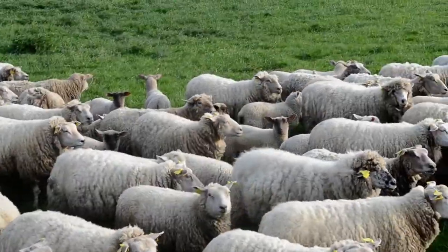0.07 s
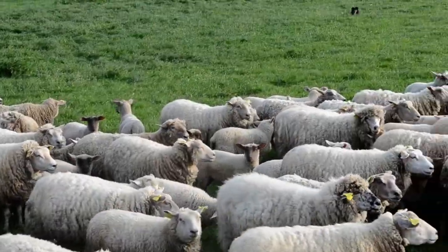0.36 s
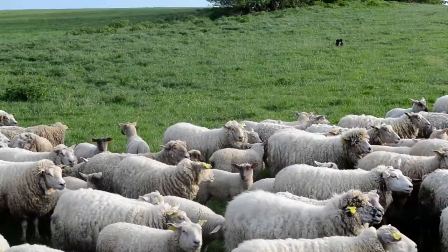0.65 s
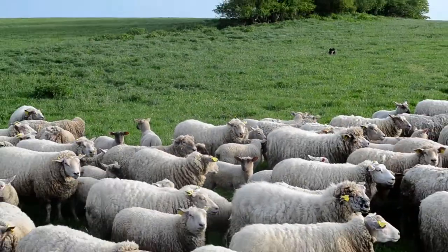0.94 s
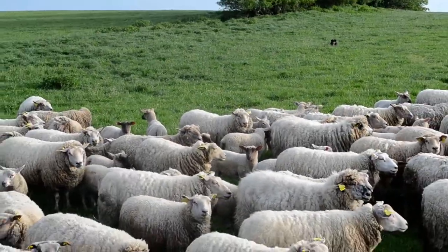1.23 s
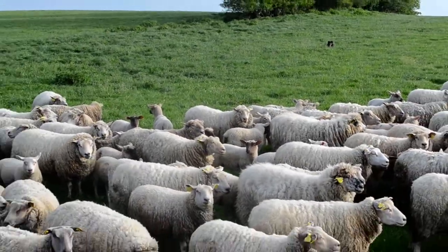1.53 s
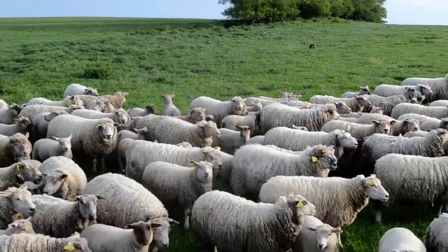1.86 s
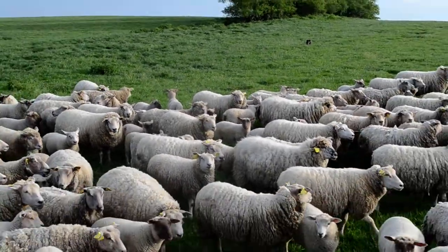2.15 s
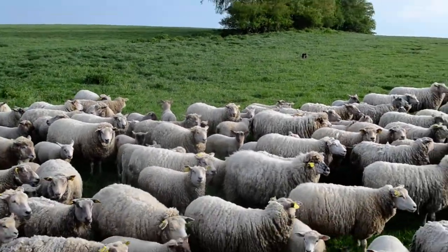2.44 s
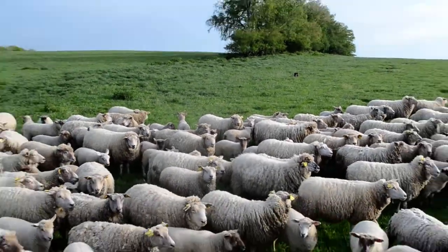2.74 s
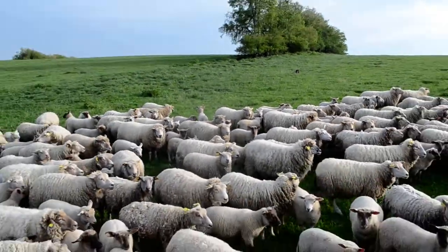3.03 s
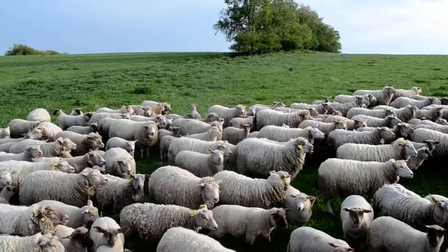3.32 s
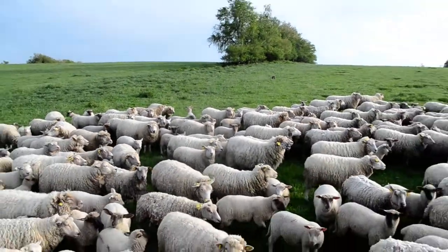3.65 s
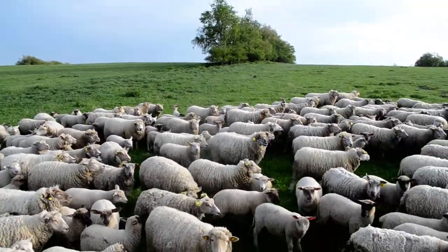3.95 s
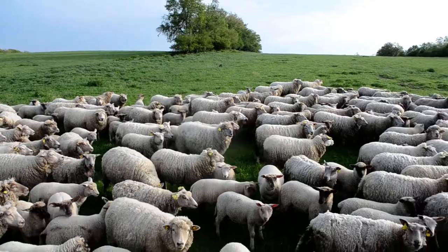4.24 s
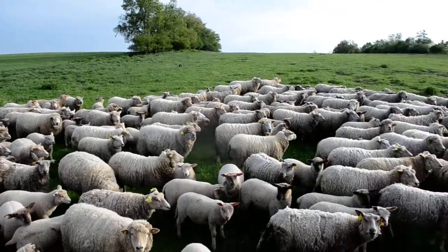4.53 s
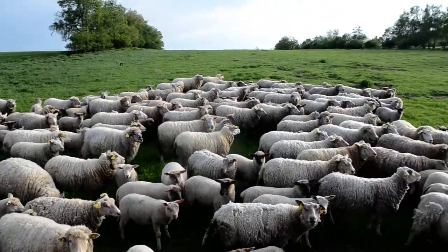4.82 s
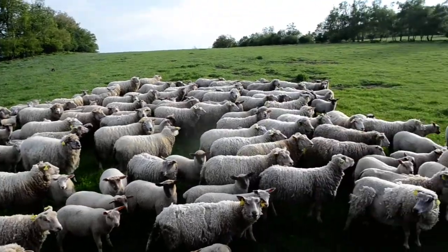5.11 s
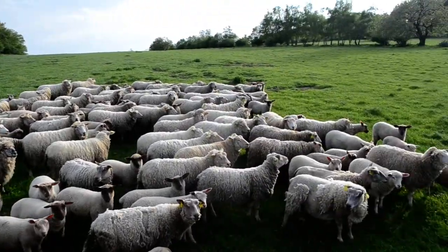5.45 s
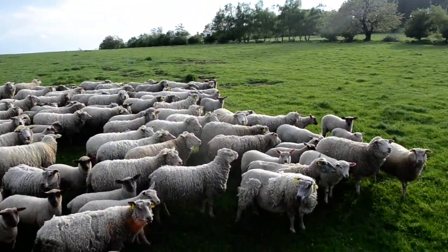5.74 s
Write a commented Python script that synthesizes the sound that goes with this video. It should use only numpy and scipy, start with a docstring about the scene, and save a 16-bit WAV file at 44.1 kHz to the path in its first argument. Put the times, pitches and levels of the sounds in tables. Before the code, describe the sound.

On an open hillside, a faint, quavering sheep bleat sounds over a soft, steady hiss of air. After about a second, wind rumbles on the microphone and a ewe gives one loud, raspy bleat close by. The rest is quiet: snuffles, creaky throat clicks, light hoof knocks, snapping stalks and brushed grass, with thin whistles of distant birds. A short dry trill comes midway and a soft, low grunt near the end.

```python
"""Sheep on a grassy hillside. Over a steady hiss of air, a faint bleat rattles; snuffles, throat creaks,
shuffling feet and thin whistles of distant birds follow. After a second, as wind buffets the microphone,
a ewe bleats close by, her vocal folds pulsing through a changing throat: a creaky start, an open cry,
a held note, a sagging end. Stalks snap, hooves knock and legs brush the grass. Past three seconds a dry
trill quickens; more creaks come in runs, and a low grunt sounds near the end."""
import sys
import numpy as np
from scipy import signal
from scipy.fft import rfft, irfft, next_fast_len
from scipy.io import wavfile
from scipy.ndimage import uniform_filter1d, map_coordinates

SR = 44100
rng = np.random.default_rng(int(sys.argv[2]) if len(sys.argv) > 2 else 0)


def persist_wave(psi):
    """Save psi, clipped to +-1, as 16-bit WAV."""
    counts = np.round(np.clip(psi, -1, 1) * 32767).astype(np.int16)
    wavfile.write(sys.argv[1], SR, np.atleast_2d(counts).T)


N = 263718


def amp(db):
    """Amplitude ratio of a level in decibels."""
    return 10 ** (np.asarray(db) / 20)


def unit(x):
    """Normalisation to rms 1."""
    return x / np.sqrt(np.mean(x ** 2) + 1e-20)


def at_peak(x, db):
    """Normalisation to a peak level."""
    return amp(db) * x / np.abs(x).max()


def levelled(x):
    """Normalisation to a running rms of 1 over a few cycles."""
    power = uniform_filter1d(uniform_filter1d(x ** 2, size=1400), size=1400)
    return x / np.sqrt(np.abs(power) + 1e-9)


def clock():
    """The time of every sample in seconds."""
    return np.arange(N) / SR


def curves(rows):
    """Linear interpolation: one value per sample for each column after the time."""
    times, *columns = np.transpose(rows)
    return [np.interp(clock(), times, column) for column in columns]


def swell(rows, fade_s):
    """Amplitude envelope from the last column (dB), fading to silence outside its span."""
    inside_s = np.minimum(clock() - rows[0][0], rows[-1][0] - clock())
    return amp(curves(rows)[-1]) * np.clip(1 + inside_s / fade_s, 0, 1)


def gate(start_s, end_s, attack_s, release_s):
    """Trapezoidal envelope: rises around the start, holds, falls around the end."""
    return np.clip(.5 + np.minimum((clock() - start_s) / attack_s, (end_s - clock()) / release_s), 0, 1)


def bumps(rows):
    """A sum of Gaussian envelopes, each with standard deviation sigma_s."""
    return sum(amp(db) * np.exp(-.5 * ((clock() - s) / sigma_s) ** 2) for s, sigma_s, db in rows)


def wobble(rate_hz):
    """Random modulation: a smooth curve through rate_hz random values a second."""
    return map_coordinates(rng.standard_normal(int(N * rate_hz / SR) + 4), [np.arange(N) * rate_hz / SR])


def colour(x, spectrum, peaks=()):
    """Minimum-phase filter of unit energy: a spectral outline with Lorentzian peaks or dips."""
    size = 2 * next_fast_len(len(x) // 2 + 2048)
    hz = np.fft.rfftfreq(size, 1 / SR)
    outline_hz, outline_db = np.transpose(spectrum)
    db = np.interp(np.log(hz + 1), np.log(outline_hz + 1), outline_db)
    for centre_hz, width_hz, lift_db in peaks:
        db = db + lift_db / (1 + (2 * (hz - centre_hz) / width_hz) ** 2)
    cepstrum = irfft(np.log(unit(amp(db)) + 1e-6))
    cepstrum[1:size // 2] *= 2  # folding the cepstrum makes the filter causal
    cepstrum[size // 2 + 1:] = 0
    return irfft(rfft(x, size) * np.exp(rfft(cepstrum)))[:len(x)]


def noise(spectrum, peaks=()):
    """Filtered white noise of rms 1."""
    return unit(colour(rng.standard_normal(N), spectrum, peaks))


def burst(t, t60_s, spectrum):
    """Impact noise: an exponentially decaying excitation, filtered."""
    return colour(rng.standard_normal(len(t)) * amp(-60 * t / t60_s), spectrum)


def resonance(x, hz, width_hz):
    """Heterodyne band-pass at a fixed or moving frequency: shift to zero, smooth, shift back."""
    carrier = np.exp(2j * np.pi * np.cumsum(np.broadcast_to(hz, N)) / SR)
    pole = np.exp(-np.pi * width_hz / SR)
    return 2 * np.real(carrier * signal.lfilter([1 - pole], [1, -pole], x / carrier))


def add(track, start_s, sound):
    """Superposition of a short sound on a track."""
    part = track[max(round(start_s * SR), 0):][:len(sound)]
    part += sound[:len(part)]


def open_air():
    """Broadband noise: the even rush of the hillside and a high hiss of grass whose level wanders."""
    # frequency_hz, level_db
    air_spectrum = [(30, -25), (70, -13), (140, -5), (300, -3), (800, -2.5), (1300, -5), (2200, -6.5),
                    (5000, -17.5), (11000, -55.5)]
    blade_spectrum = [(1000, -10), (2500, -2), (5000, 0.5), (8800, 0.5), (10000, -3), (11400, -21)]
    # level of the high hiss: time_s, level_db
    hiss_level = [(0, -64), (3.2, -69.5), (3.9, -65), (4.15, -72.5), (4.6, -68), (5.98, -64.5)]
    hiss = amp(curves(hiss_level)[0] + .6 * wobble(14)) * noise(blade_spectrum)
    return amp(-62) * noise(air_spectrum) + hiss


def wind(lumps_db=3.5):
    """Turbulent pressure fluctuations at the microphone make a low, lumpy rumble."""
    # one long gust, then calm: time_s, level_db
    gust = [(0, -70.5), (1.05, -67), (1.17, -53.5), (1.82, -54.5), (2.12, -67), (2.8, -74), (3.1, -87),
            (5.98, -77.5)]
    # short puffs on top: centre_s, sigma_s, level_db
    puffs = [(2.035, 0.015, -58.5), (2.385, 0.011, -48.5), (2.48, 0.011, -53.5), (2.96, 0.025, -56)]
    # frequency_hz, level_db
    buffet_spectrum = [(13, -54), (22, -31), (48, -6), (107, -2.5), (210, -7.5), (280, -14.5), (430, -45),
                       (730, -120)]
    strength = amp(curves(gust)[0] + lumps_db * wobble(23.9)) + bumps(puffs)
    return amp(-1) * strength * levelled(noise(buffet_spectrum, peaks=[(116, 55, 3.5)]))


def vocal_folds(pitch_hz, pulse_at_s, roughness, jitter, shimmer_db):
    """Glottal source: a pulse and a puff of turbulence each cycle, less steady and breathier if rough."""
    roughness = np.broadcast_to(roughness, N)
    cycles = np.cumsum(pitch_hz * (1 + jitter * roughness * wobble(90))) / SR
    cycles -= np.interp(pulse_at_s, clock(), cycles)
    closures = np.interp(np.arange(np.ceil(cycles[0]) + 2, cycles[-1] - 2), cycles, np.arange(N))
    whole = closures.astype(int)
    shimmer = amp(shimmer_db * roughness[whole] * rng.standard_normal(len(closures)))
    heights = np.sqrt(SR / pitch_hz[whole]) * shimmer
    taps = whole[:, None] + np.arange(-7, 9)
    offset = taps - closures[:, None]
    shapes = heights[:, None] * np.sinc(offset) * np.sinc(offset / 8)  # band-limited impulses
    pulses = np.bincount(taps.ravel(), shapes.ravel(), N)
    puffs = unit(rng.standard_normal(N) * (np.exp(-9 * (cycles % 1)) + 0.14))
    return (pulses + roughness * puffs) / np.sqrt(1 + roughness ** 2)


def rattling_bleat():
    """Amplitude modulation makes a thin, hoarse voice quaver while one resonance sinks."""
    # time_s, pitch_hz
    pitch = [(0, 131.6), (.124, 133.4), (.18, 139.7), (.23, 145.5), (.3, 147.3), (.335, 151.7),
             (.36, 140.2), (.44, 133.4)]
    # time_s, level_db
    quaver = [(.034, -52), (.054, -56), (.061, -42), (.076, -44), (.09, -59), (.11, -55.5), (.137, -44.5),
              (.163, -54.5), (.192, -46.5), (.222, -44), (.238, -48), (.263, -43), (.288, -47.5),
              (.308, -43), (.346, -42), (.366, -54), (.398, -43.5), (.425, -46.5), (.437, -52)]
    # frequency_hz, level_db
    throat = [(200, -16), (600, -12.5), (980, -8.5), (1450, -11), (1800, -8.5), (2200, -0.5), (2700, -2),
              (3200, -9), (3800, -7), (4900, -15.5), (5500, -13), (6400, -36), (10000, -58)]
    # centre_hz, width_hz, lift_db
    formants = [(970, 310, 11), (2020, 300, 5.5), (2460, 110, 5.5), (3160, 250, 12.5)]
    # time_s, centre_hz
    sinking_ring = [(.06, 2260), (.22, 2270), (.43, 2020)]
    source = vocal_folds(curves(pitch)[0], pulse_at_s=.304, roughness=.48, jitter=.035, shimmer_db=2)
    voice = colour(source, throat, formants)
    voice += 1.54 * resonance(voice, curves(sinking_ring)[0], width_hz=180)
    return levelled(voice) * swell(quaver, fade_s=.008)


def snuffles(flutter_db=0.77, gain_db=2.1):
    """Turbulent breath rushes unevenly through a sheep's muzzle and excites its nostril resonances."""
    # start_s, length_s, level_db, growth_db
    breaths = [(0.391, .63, -52.5, .5), (1.838, 0.12, -45.5, -11.5), (2.516, 0.39, -56, 11),
               (3.437, 0.3, -52.5, 4.5), (3.799, 0.078, -57.5, -0.5), (3.91, 0.13, -71, 11),
               (5.67, 0.2, -64.5, 0)]
    # frequency_hz, level_db
    muzzle = [(150, -13), (600, -4), (1200, 1), (1450, -2), (1900, 6), (2250, 0.5), (2900, -2), (3500, -6),
              (4000, -5.5), (5500, -13.5), (8600, -12.5), (10500, -29)]
    # centre_hz, width_hz, lift_db
    nostril = [(1733, 130, 5), (2473, 190, 16.5)]
    flow = np.zeros(N)
    for start_s, length_s, level_db, growth_db in breaths:
        progress = np.clip((clock() - start_s) / length_s, 0, 1)
        envelope = gate(start_s, start_s + length_s, attack_s=0.04, release_s=0.086)
        flow += amp(level_db + growth_db * progress) * envelope
    return flow * amp(gain_db + flutter_db * wobble(70)) * noise(muzzle, nostril)


def creaks(attack_s=0.0011, rise_per_s=4):
    """Vocal fry: slack folds flap in single pulses, each a dry tick and damped modes bending upward."""
    # even runs of pulses: first_s, last_s, count, first_peak_db, last_peak_db, ring_hz, tick_over_ring_db
    runs = [ (.491, .491, 1, -33.5, -34, 2580, -6), (1.041, 1.052, 2, -35, -30.5, 2100, -13),
            (1.064, 1.064, 1, -31, -38, 2030, -5), (1.075, 1.086, 2, -27, -25, 2080, -10),
            (3.131, 3.1315, 1, -43, -42.5, 1854, -7), (3.261, 3.2725, 2, -45, -40, 1860, -4),
            (3.304, 3.304, 1, -41.5, -43, 1910, -8), (4.4596, 4.4593, 1, -41, -40.5, 1740, 1),
            (4.544, 4.545, 1, -39.5, -38, 1900, -14), (4.57, 4.581, 2, -38, -34, 1930, -15),
            (4.609, 4.609, 1, -36, -36.5, 2000, -8), (4.6355, 4.648, 2, -41, -35, 1860, -15),
            (4.676, 4.69, 2, -41, -42, 2170, 2), (4.713, 4.72, 2, -34, -34.5, 1830, -11),
            (4.731, 4.743, 2, -36, -40, 1870, -5), (4.758, 4.7995, 4, -41, -39, 2040, 7),
            (5.836, 5.8594, 4, -45, -39.5, 2150, -5), (5.931, 5.967, 2, -41, -38.5, 1840, -1), ]
    # throat modes: frequency_ratio, level_db, t60_s (for a 2000 Hz ring)
    modes = [(.57, -3, 0.03), (.86, -4, 0.013), (1.028, 19.5, 0.012), (1.32, -3, 0.01)]
    # frequency_hz, level_db
    tick_spectrum = [(400, -21), (1050, 6), (2400, 7), (3400, -15.5), (5200, -27)]
    out, t = np.zeros(N), np.arange(SR // 20) / SR
    bent_time = t * (1 + rise_per_s * (t - .005))
    for first_s, last_s, count, first_db, last_db, ring_hz, tick_db in runs:
        age = t * ring_hz / 2000  # higher rings die sooner
        phase = 2 * np.pi * ring_hz * bent_time
        for start_s, peak_db in np.linspace((first_s, first_db), (last_s, last_db), count):
            ring = sum(amp(level_db + rng.standard_normal() - 60 * age / t60_s) * np.sin(ratio * phase)
                       for ratio, level_db, t60_s in modes)
            ring *= 1 - np.exp(-t / attack_s)
            tick = burst(t, t60_s=0.0059, spectrum=tick_spectrum)
            add(out, start_s, at_peak(unit(ring) + amp(tick_db) * unit(tick), peak_db))
    return out


def friction(strokes, spectrum, grain_db):
    """Friction noise: random amplitude modulation gives grain to strokes that swell and fade."""
    return bumps(strokes) * unit(noise(spectrum) * amp(grain_db * wobble(250)))


def shuffles():
    """Friction of feet on turf gives a dull scuff."""
    # centre_s, sigma_s, level_db
    strokes = [(.59, 0.05, -58), (2.205, 0.014, -61), (4.33, 0.064, -54.5), (5.44, 0.045, -59),
               (5.81, 0.032, -58.5)]
    # frequency_hz, level_db
    turf = [(60, -60), (140, 2.5), (200, -4), (260, -4), (450, -6), (900, -11.5), (1400, -17), (2500, -24),
            (5000, -40)]
    return friction(strokes, turf, grain_db=2.5)


def bird_whistles(waver=0.024, echo_db=-6, echo_t60_s=.4):
    """Frequency modulation: thin notes glide and waver; reflection from trees adds a faint echo."""
    # start_s, length_s, start_hz, end_hz, level_db
    notes = [(0.795, 0.053, 3250, 2920, -59), (2.132, 0.11, 2270, 1970, -59.5), (2.3, .11, 3120, 3030, -68),
             (2.405, 0.09, 2170, 2000, -61), (2.57, .07, 2200, 2080, -61), (3.286, 0.2, 7250, 7450, -71),
             (3.793, 0.1, 5900, 6750, -69), (4.17, 0.065, 1966, 2150, -57), (4.224, 0.088, 2820, 2440, -56),
             (4.432, 0.06, 2015, 2350, -58.5), (4.48, .06, 2500, 2720, -67), (4.73, 0.12, 3150, 3560, -71),
             (4.795, 0.093, 2220, 2130, -68), (5.865, 0.049, 2880, 2580, -57.5)]
    out, unsteady = np.zeros(N), 1 + waver * wobble(550)
    for start_s, length_s, start_hz, end_hz, level_db in notes:
        progress = np.linspace(0, 1, round(length_s * SR))
        glide_hz = start_hz + (end_hz - start_hz) * progress
        hz = glide_hz * unsteady[round(start_s * SR):][:len(progress)]
        envelope = amp(level_db) * np.sqrt(2) * np.sin(np.pi * progress)
        add(out, start_s, envelope * np.sin(2 * np.pi * np.cumsum(hz) / SR))
    tail = rng.standard_normal(SR // 2) * amp(-60 * np.arange(SR // 2) / SR / echo_t60_s)
    return out + amp(echo_db) * signal.fftconvolve(out, tail / np.linalg.norm(tail))[:N]


def fold_rebound(source, share=.7, scatter=.06, tighten_s=1.271):
    """Until they tighten, slack folds rebound: a weaker slap about 1 ms after each pulse makes a rasp."""
    # time_s, rate_hz
    bounce_rate = [(1.15, 737), (1.2, 866), (1.24, 935)]
    delay_s = (1 + scatter * wobble(130)) / curves(bounce_rate)[0]
    slap = map_coordinates(source, [np.arange(N) - delay_s * SR])
    return source + share * (clock() < tighten_s) * slap


def vocal_tract(source, mouth_shape):
    """Formant filtering, cross-faded through four mouth shapes: 0 opening, 1 wide, 2 held, 3 closing."""
    # throat spectra: frequency_hz, level_db
    opening = [(100, -58.5), (350, -14), (600, -6.5), (1050, -18), (1400, -6.5), (1750, -5), (2550, 2.5),
               (3300, -13), (3800, -9.5), (4700, -23.5), (5200, -28), (7400, -27.5), (11000, -54)]
    wide = [(100, -40), (300, -24.5), (500, -10), (1000, -18), (1600, -10.5), (2350, -2), (2800, -10),
            (3900, -14.5), (4700, -22), (5200, -31), (8000, -29.5), (11000, -67)]
    held = [(100, -28.5), (290, -22), (450, -14), (850, -8.5), (1050, -14), (1600, -11), (2400, -8),
            (2650, -14.5), (3050, -16.5), (3400, -24), (4800, -31.5), (7400, -38), (11000, -55)]
    closing = [(100, -25), (300, -13.5), (500, -4.5), (850, -1.5), (1050, -9.5), (1600, -10), (2750, -3.5),
               (3600, -23.5), (4700, -22), (7500, -40), (11000, -48)]
    # throat resonances and antiresonances of side cavities: centre_hz, width_hz, lift_db
    opening_formants = [(553, 93, 17), (1387, 180, 15), (2190, 260, 7.5)]
    open_formants = [(588, 76, 14.5), (1307, 171, 17.5), (2065, 274, 11.5), (2393, 170, 7),
                     (3770, 230, 3.5)]
    closing_formants = [(780, 140, 3.5), (1257, 100, 19.5), (2100, 190, 7)]
    hollows = [(5030, 310, -11), (6460, 590, -17)]
    throats = [(opening, opening_formants + hollows), (wide, open_formants + hollows),
               (held, open_formants), (closing, closing_formants)]
    return sum(np.clip(1 - np.abs(mouth_shape - k), 0, 1) * colour(source, *throat)
               for k, throat in enumerate(throats))


def shifting_resonances(voice):
    """Time-varying filtering: low booms, a soft onset and two high peaks sinking with a dip between."""
    # the lowest resonance booms as the voice catches and at its crest: centre_s, sigma_s, level_db
    booms = [(1.15, 0.015, -12), (1.287, 0.0057, -3)]
    # the first pulses close softly and lack their upper edge: time_s, missing_share
    soft_start = [(1.12, .45), (1.165, 0)]
    # a high resonance sinks from the crest onward: time_s, centre_hz
    top_ring = [(1.29, 4670), (1.38, 4420), (1.46, 3950), (1.68, 3800), (1.8, 3384)]
    top_hz, = curves(top_ring)
    voice = voice + bumps(booms) * resonance(voice, hz=563, width_hz=72)
    voice -= curves(soft_start)[0] * resonance(voice, hz=4300, width_hz=1500)
    voice += .6 * resonance(voice, top_hz, width_hz=220)
    voice -= .75 * resonance(voice, top_hz + 440, width_hz=280)
    return voice + .85 * resonance(voice, top_hz + 640, width_hz=270)


def close_bleat(hoarse_db=-29):
    """Source and filter: glottal pulses pass through a throat that opens, settles and closes."""
    # time_s, pitch_hz
    pitch = [(1.1, 95.9), (1.13, 109.4), (1.2, 127.8), (1.262, 130.9), (1.292, 140.5), (1.32, 130.5),
             (1.4, 141.9), (1.46, 146.2), (1.53, 144.6), (1.74, 142.2), (1.812, 134.6), (1.835, 110.6)]
    # time_s, level_db
    loudness = [(1.102, -41.5), (1.11, -34), (1.13, -32.5), (1.18, -28), (1.29, -22), (1.33, -25),
                (1.6, -28), (1.75, -30.5), (1.8, -34), (1.825, -35), (1.84, -42), (1.865, -44.5),
                (1.88, -57)]
    # time_s, roughness, mouth_shape
    articulation = [(1.1, 0.29, 0), (1.2, 0.25, 0.5), (1.25, 0.22, .4), (1.285, .13, .85),
                    (1.355, .13, 1.26), (1.43, .13, 1.71), (1.74, .15, 2), (1.795, .25, 2.5),
                    (1.825, 0.3, 3), (1.88, 0.87, 3)]
    # air that passes the folds along with the tone: frequency_hz, level_db
    hoarse_air = [(300, 2), (700, -17), (1500, -20), (2400, -11), (3400, 4), (4300, 1), (5100, -5.5),
                  (7200, -6.5), (11000, -31)]
    roughness, mouth_shape = curves(articulation)
    source = vocal_folds(curves(pitch)[0], pulse_at_s=1.109, roughness=roughness,
                         jitter=.015, shimmer_db=1)
    voice = shifting_resonances(vocal_tract(fold_rebound(source), mouth_shape))
    return (levelled(voice) + amp(hoarse_db) * noise(hoarse_air)) * swell(loudness, fade_s=0.01)


def stalks(gain_db=-4):
    """Brittle fracture: each snapping stalk gives a tiny burst of bright noise."""
    # start_s, level_db, centre_hz
    snaps = [(1.266, -34, 9600), (2.091, -36, 3280), (2.406, -32.5, 7400), (5.247, -38, 5950)]
    out, t = np.zeros(N), np.arange(SR // 30) / SR
    for start_s, level_db, hz in snaps:
        snap = burst(t, t60_s=0.003, spectrum=[(hz / 1.7, -36), (hz, 0), (1.3 * hz, -20)])
        add(out, start_s, at_peak(snap, level_db + gain_db))
    return out


def hooves(t60_s=0.033, gain_db=-1):
    """Damped impact: each hoof gives a thud with a gritty click on top."""
    # start_s, level_db, click_over_thud_db
    knocks = [(2.024, -44.5, 1), (2.195, -44.5, -14), (2.209, -43, -15), (2.992, -36, 3.5),
              (3.745, -35, -16), (3.934, -41, -5.5), (4.492, -49.5, -3), (5.333, -43.5, -24),
              (5.377, -43, -30), (5.404, -49, -21), (5.464, -46.5, -26), (5.773, -43, -13),
              (5.945, -41.5, -8)]
    # frequency_hz, level_db
    thud_spectrum = [(40, -53), (130, -25), (300, -1), (550, 4.5), (1200, 2.5), (1800, -22), (5000, -58)]
    click_spectrum = [(900, -52), (1900, -4), (2600, 7.5), (3600, -14), (4800, -30), (11000, -55)]
    out, t = np.zeros(N), np.arange(SR // 12) / SR
    for start_s, level_db, click_db in knocks:
        thud = at_peak(burst(t, t60_s, thud_spectrum), level_db)
        click = at_peak(burst(t, t60_s, click_spectrum), level_db + click_db)
        add(out, start_s, thud + click)
    return amp(gain_db) * out


def swishes():
    """Friction of legs against grass gives a brief, bright swish."""
    # centre_s, sigma_s, level_db
    strokes = [(2.088, 0.014, -50.5), (3.085, 0.018, -52.5), (4.035, 0.017, -57), (4.67, .025, -64),
               (5.72, 0.036, -54)]
    # frequency_hz, level_db
    grass = [(290, -64), (500, -9), (1020, -3), (2180, -10), (2450, -2), (4120, -12.5), (8720, -11),
             (12000, -38)]
    return friction(strokes, grass, grain_db=3.0)


def trill(start_s=3.201, first_gap_s=.0202, first_sigma_s=.0029, first_hz=2337, climb_hz=71):
    """Linear chirps: noisy upward sweeps in Gaussian envelopes grow shorter, higher and closer."""
    # time_s, peak_db
    loudness = [(3.2, -49.5), (3.27, -49.5), (3.32, -38.5), (3.38, -41.5), (3.4, -45)]
    # frequency_hz, level_db
    chirp_spectrum = [(500, -18), (1100, 7), (1550, -5), (2000, -1), (3100, -1), (3700, -6), (4300, -11),
                      (6000, -18), (10000, -30)]
    out, t = np.zeros(N), np.arange(-(SR // 100), SR // 100) / SR
    for k in range(12):
        stretch, detune = 1 + rng.standard_normal(2) * [.16, .04]
        sigmas = t / (first_sigma_s * .94 ** k * stretch)
        hz = detune * (first_hz + k * climb_hz) + 676 * sigmas
        gritty_tone = np.sin(2 * np.pi * np.cumsum(hz) / SR) + rng.standard_normal(len(t))
        chirp = colour(np.exp(-.5 * sigmas ** 2) * gritty_tone, chirp_spectrum)
        peak_db = np.interp(start_s, *np.transpose(loudness))
        add(out, start_s + t[0], at_peak(chirp, peak_db))
        start_s += first_gap_s * .976 ** k
    return out


def grunt():
    """A few slow glottal pulses excite the low resonances of the throat."""
    # time_s, pitch_hz, level_db
    contour = [(5.643, 92.3, -54), (5.655, 89.5, -47), (5.668, 93.9, -44), (5.682, 97, -49)]
    # frequency_hz, level_db
    throat = [(120, -38), (274, -34), (362, -12), (516, 3.5), (691, -8), (832, -20), (1280, -7),
              (1520, -22), (2170, -10), (2490, -25), (4500, -29), (8000, -60)]
    source = vocal_folds(curves(contour)[0], pulse_at_s=5.643, roughness=.4, jitter=.04, shimmer_db=2)
    return unit(colour(source, throat)) * swell(contour, fade_s=0.0098)


def scene():
    """Superposition in a free field: air, voices and feet add, and the near sounds have no echo."""
    background = open_air() + wind() + bird_whistles()
    voices = rattling_bleat() + snuffles() + creaks() + close_bleat() + trill() + grunt()
    feet = shuffles() + stalks() + hooves() + swishes()
    return (background + voices + feet)[None]


def record(dry, notch_hz=7930, notch_width_hz=360, notch_db=-9.5, cutoff_hz=11200):
    """Frequency response: the microphone's narrow treble notch, then a steep low-pass band limit."""
    size = next_fast_len(N + SR // 4)
    hz = np.fft.rfftfreq(size, 1 / SR)
    notch = amp(notch_db / (1 + (2 * (hz - notch_hz) / notch_width_hz) ** 2))
    low_pass = 1 / np.sqrt(1 + (hz / cutoff_hz) ** 90)
    return irfft(rfft(dry, size) * notch * low_pass, size)[:, :N]


dry = scene()
out = record(dry)
persist_wave(out)
```